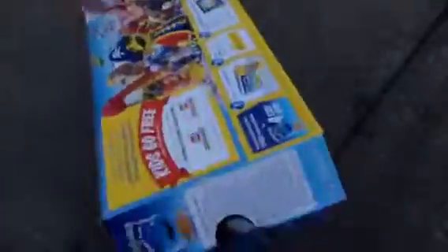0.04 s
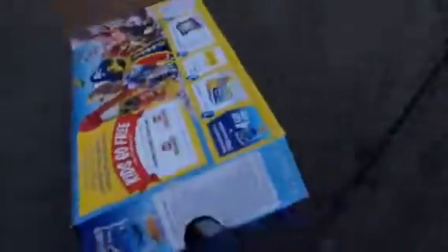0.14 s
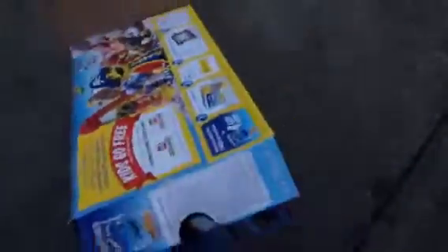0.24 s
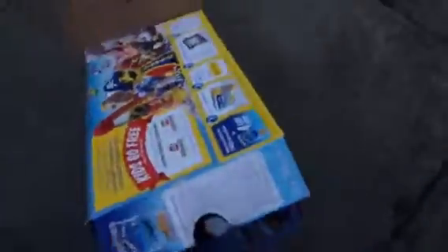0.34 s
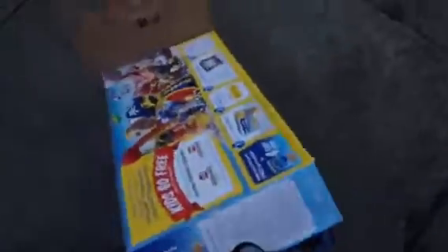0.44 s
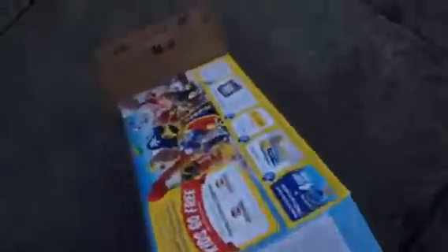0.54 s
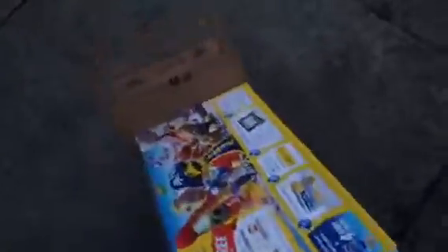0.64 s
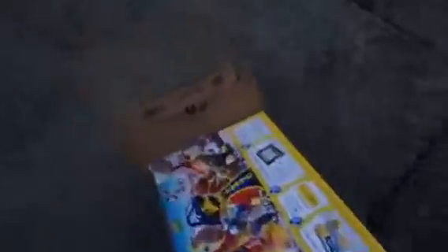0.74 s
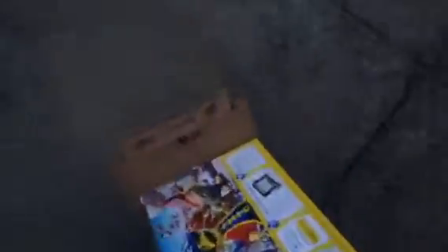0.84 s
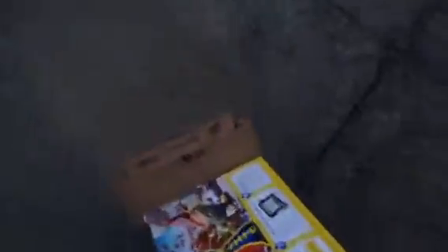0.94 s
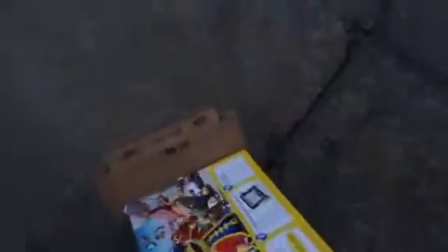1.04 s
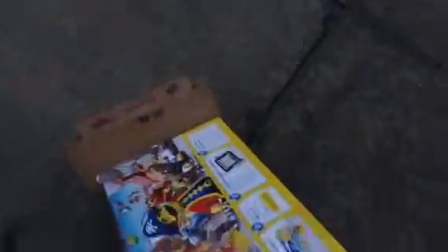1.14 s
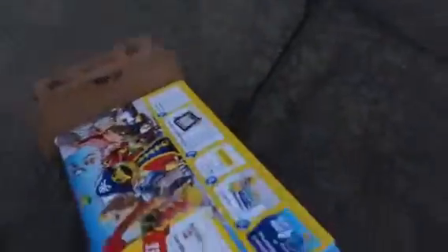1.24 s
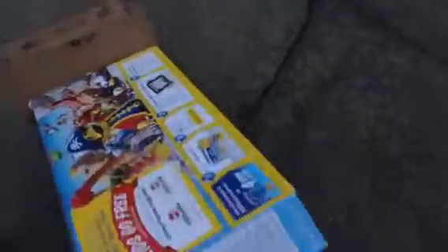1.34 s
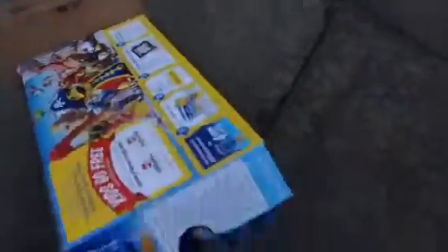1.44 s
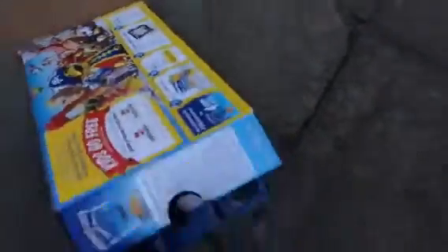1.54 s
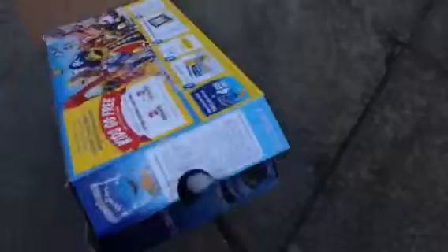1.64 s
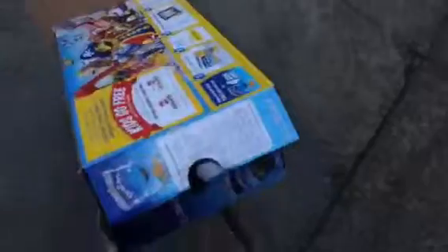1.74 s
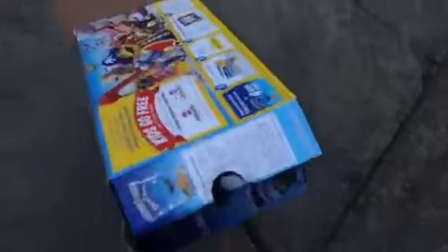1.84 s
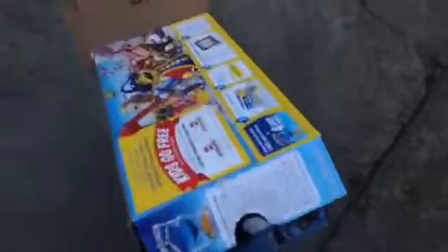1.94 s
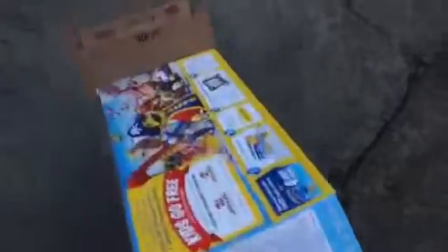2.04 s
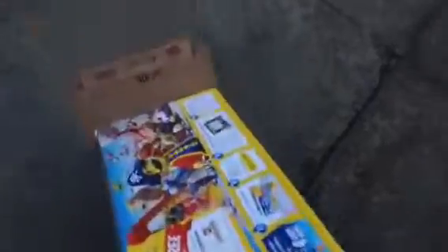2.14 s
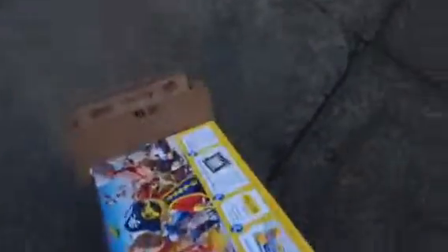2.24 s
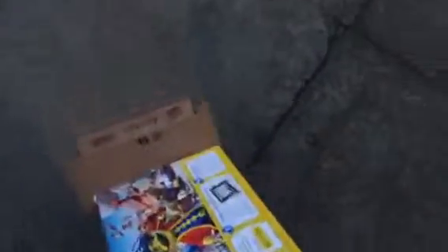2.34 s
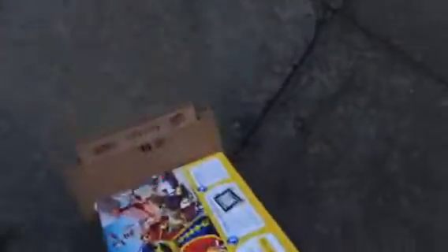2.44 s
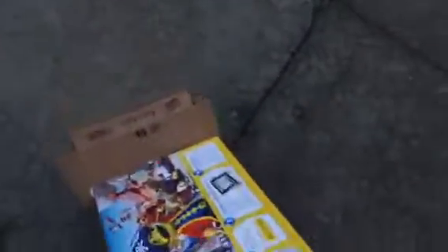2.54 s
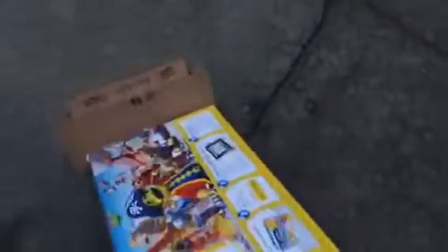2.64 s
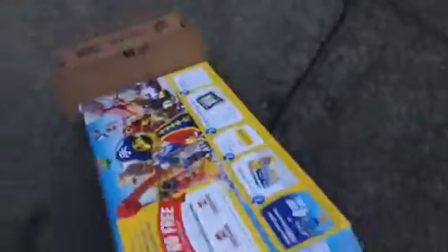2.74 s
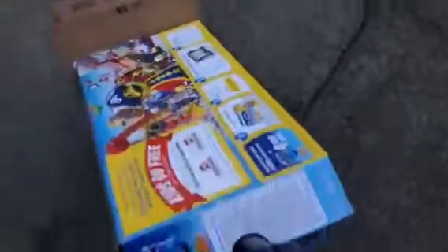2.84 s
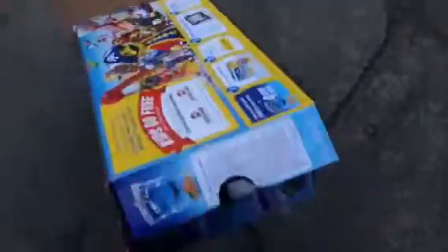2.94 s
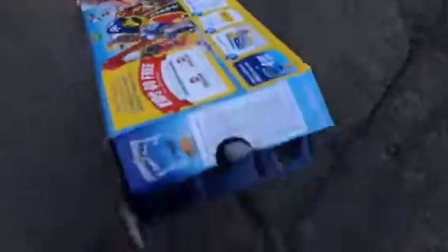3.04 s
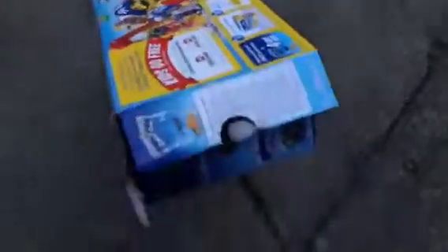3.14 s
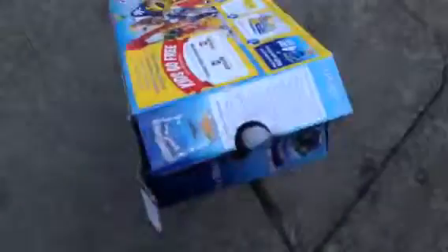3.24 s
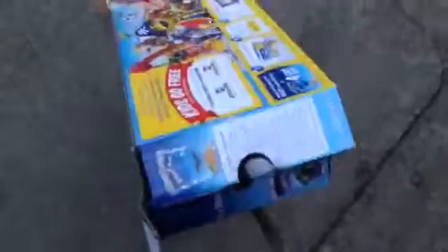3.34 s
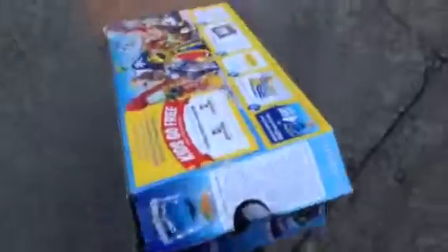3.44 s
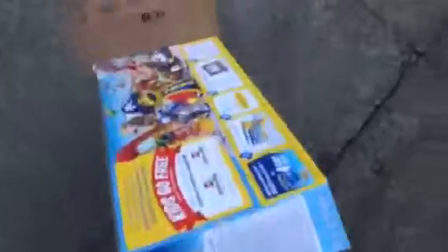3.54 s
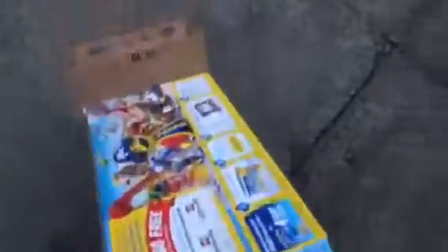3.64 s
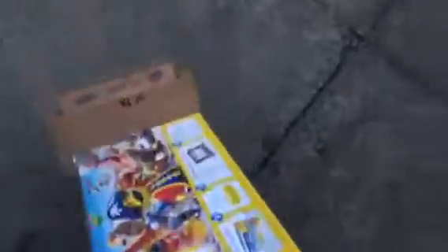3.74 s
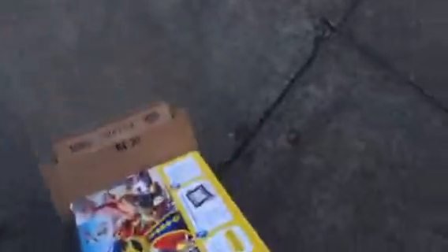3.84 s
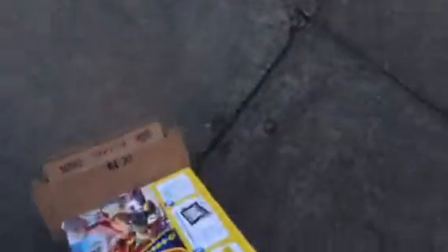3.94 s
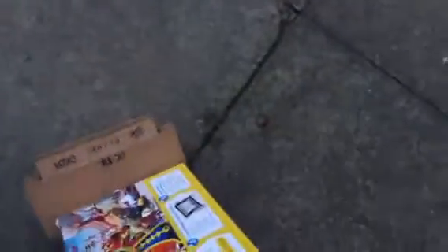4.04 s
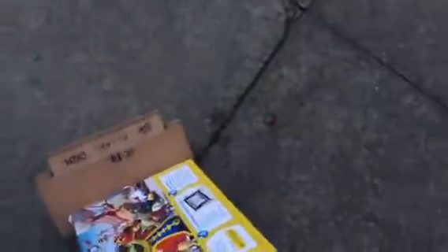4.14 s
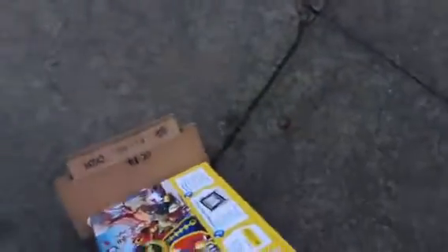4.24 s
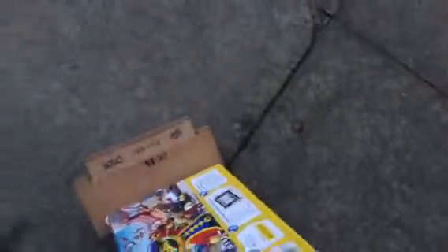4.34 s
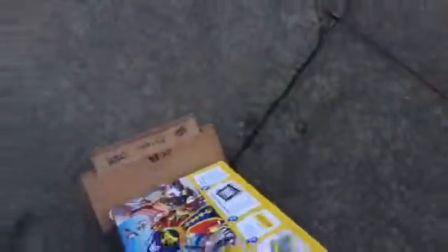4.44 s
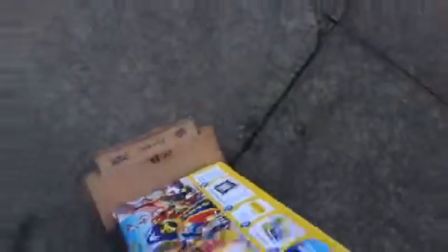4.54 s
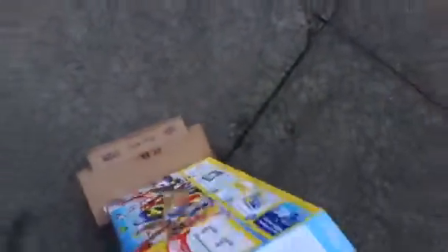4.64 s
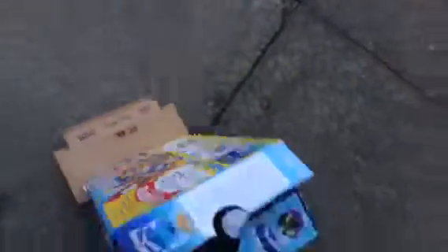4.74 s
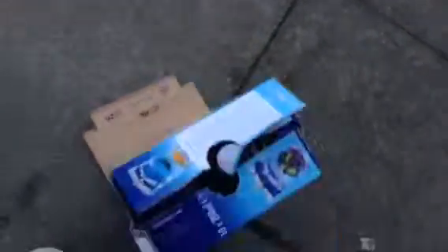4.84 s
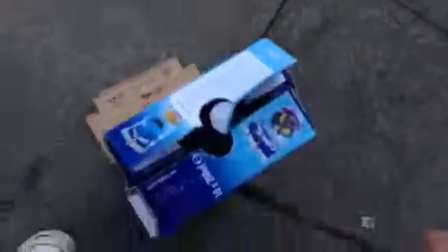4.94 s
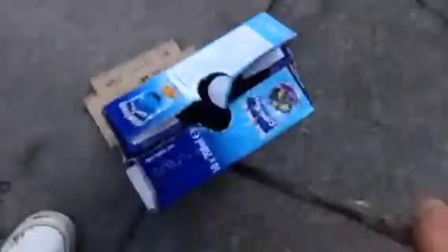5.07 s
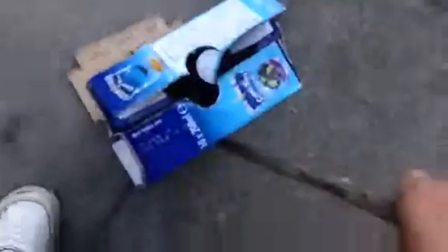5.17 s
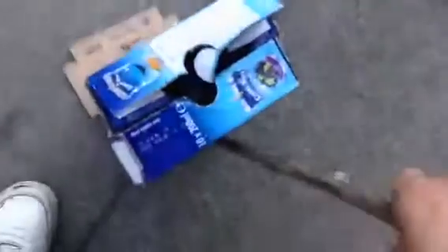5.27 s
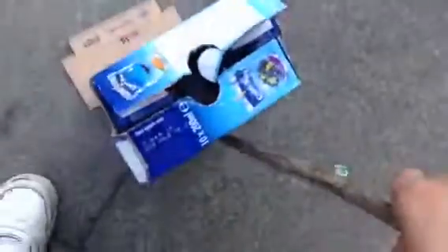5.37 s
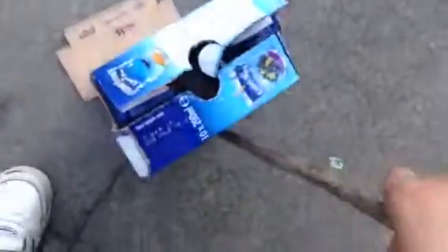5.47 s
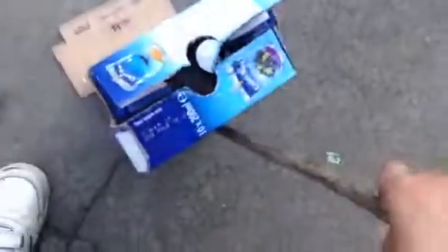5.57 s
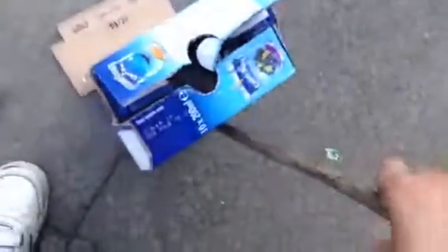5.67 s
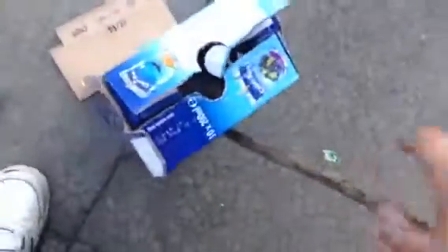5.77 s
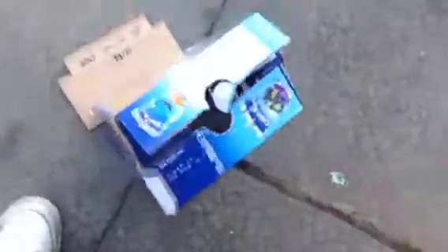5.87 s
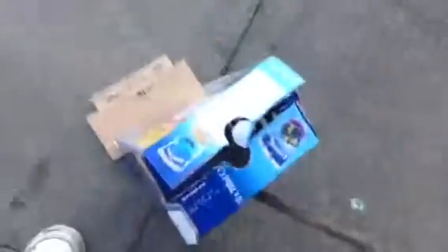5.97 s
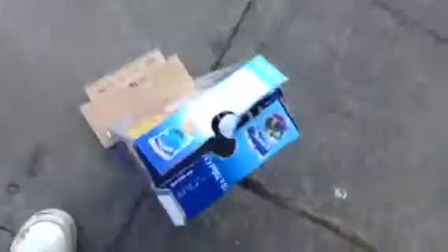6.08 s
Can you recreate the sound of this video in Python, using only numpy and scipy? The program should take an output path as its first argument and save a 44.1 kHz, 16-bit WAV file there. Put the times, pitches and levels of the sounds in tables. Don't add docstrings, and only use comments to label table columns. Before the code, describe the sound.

Outdoors, close and dry, an empty cardboard box is dragged over gritty concrete. The sound begins mid-stroke; pulls and pushes alternate with very short dips near 0.45, 1.15, 1.9, 2.6 and 3.3 seconds. Each scrape mixes bright sandy hiss, papery mid-range rattle and hollow low boom, broken by uneven bumps and snapping grit. The second stroke is louder, the fifth loud and hissing. Thin squeaks sing at turns, notably around 1.1 and an arching one at 3.3 to 3.5. A strong jolt lands at 1.55; near 3.8 the box hops with rapid hollow thumps. Dragging stops about 4.1, with a dull knock and tiny ticks at 4.15. Quiet traffic hum and faint rustle remain. Small ticks at 4.87 lead to a sharp, very short click at 4.94 with a soft low knock. Distant birds chirp and whistle faintly, clearest around 5.2 to 5.8, until just past 6.

```python
import sys
import numpy as np
from scipy import signal
from scipy.fft import rfft, irfft, next_fast_len
from scipy.io import wavfile
from scipy.ndimage import uniform_filter1d

SR = 44100
rng = np.random.default_rng(int(sys.argv[2]) if len(sys.argv) > 2 else 0)


def unload_audio(sound):
    columns = np.transpose(np.atleast_2d(sound))
    steps = np.round(np.clip(columns, -1, 1) * 32767)
    wavfile.write(sys.argv[1], SR, steps.astype(np.int16))


def volts(x):
    e = np.asarray(x, float) / 20
    return 10 ** e


N = 269397

# start t/s, end t/s, panel level/dB, grit over panel/dB, cavity over panel/dB
STROKES = [
    (-.3, 0.44, -37.5, 3, -3),
    (0.476, 1.132, -31.5, -1.5, -2.5),
    (1.169, 1.86, -35.5, 3.5, -2.5),
    (1.923, 2.554, -34.5, -1, -4.5),
    (2.589, 3.295, -31.5, 3, -7),
    (3.345, 4.066, -34.5, 1.5, -3),
    (4.115, 4.232, -48, -22, -4),
]
# t/s, pressure level/dB, lean level/dB (leaning frees the cavity and damps the panels)
HAND = [(0, 5, 8), (0.118, 2, 10), (0.359, -1, -1.5), (0.562, -6.5, 3.5), (0.798, 1, 2), (0.922, 0.5, 3),
        (1.078, -2.5, 1), (1.342, 5, 7), (1.599, 1, 7), (1.8, -3.5, -0.5), (2.001, 0, 4), (2.302, 5.5, 0),
        (2.66, -3, 8), (2.952, 3.5, 1.5), (3.219, -6, 1.5), (3.42, -3, -1), (3.72, 2, 1), (3.99, 2, -1)]
# t/s, peak level/dB
JOLTS = [(0.032, -19), (0.132, -17.5), (0.356, -17), (0.561, -23.5), (0.715, -16.5), (0.812, -16.5),
         (0.848, -19), (0.917, -19), (1.232, -21.5), (1.336, -15.5), (1.551, -11.5), (1.668, -18.5),
         (1.714, -26), (1.955, -23.5), (2.007, -20.5), (2.078, -16.5), (2.142, -19), (2.179, -20.5),
         (2.239, -16.5), (2.297, -22.5), (2.77, -18), (3.024, -21.5), (3.076, -17), (3.374, -24.5),
         (3.604, -16.5), (3.68, -18.5), (3.772, -11), (3.823, -19.5), (3.861, -15.5), (3.922, -12)]
# t/s, peak level/dB
HOP_LANDINGS = [
    (3.791, -19),
    (3.843, -14),
    (3.881, -17),
    (3.904, -20.5),
    (3.964, -23),
]
# t/s, peak level/dB
SNAPS = [(0.0327, -35), (0.0673, -25.5), (0.1438, -14.5), (0.2279, -23), (0.3431, -25), (0.5212, -33.5),
         (0.618, -31), (0.7133, -16.5), (0.9003, -21.5), (1.2441, -20.5), (1.2664, -30), (1.3077, -19),
         (1.33, -26), (1.5549, -25), (1.5871, -21), (1.6376, -21.5), (2.0071, -27.5), (2.1099, -26),
         (2.7752, -24), (2.9399, -22.5), (3.0199, -17), (3.1055, -24.5), (3.2685, -25.5), (3.3686, -25.5),
         (3.4311, -33.5), (3.7684, -30.5), (3.8172, -31), (3.861, -32.5), (3.903, -33), (4.0066, -26)]
# f/Hz, bandwidth/Hz, level/dB
CAVITY_MODES = [(195.7, 44, 5), (310.2, 17, 4), (367.6, 46, 1), (141, 23, -12)]
# f/Hz, bandwidth/Hz, level/dB
PANEL_MODES = [(537, 42, 1.5), (662, 52.6, 5), (806, 83, 3.5), (1036, 170, 6), (1305, 130, 8),
               (1694, 280, 2), (2093, 83, -13.5), (2520, 140, -2)]
# f/Hz, level per Hz/dB
GRIT_SPECTRUM = [(1180, -39), (2000, 5.5), (2410, 1), (2650, -8), (3000, -7), (3270, -0.5), (5550, -1.5),
                 (6610, -4), (12300, -2), (13800, -3.5), (15100, -9), (15700, -22.5), (16400, -58.5)]
# f/Hz, level per Hz/dB
AIR_SPECTRUM = [(15, -95.5), (25, -56), (87, -10), (172, 3), (196, 11), (398, -3.5), (443, -7), (481, -9),
                (805, -5), (1060, -3), (1870, -20.5), (2200, -16.5), (2880, -24.5), (12800, -27.5),
                (16400, -43.5)]
# start t/s, end t/s, f/Hz at start, middle and end, level/dB
SQUEAKS = [
    (1.015, 1.18, 2075, 2070, 2060, -43),
    (3.3, 3.47, 2620, 2810, 2480, -35),
    (3.41, 3.52, 5300, 4850, 4480, -45.5),
    (.41, .51, 2180, 2200, 2180, -54),
    (1.262, 1.33, 2170, 2180, 2190, -37),
    (2.48, 2.63, 2350, 2200, 2110, -39.5),
    (1.878, 1.9, 4150, 4200, 4150, -56),
    (1.9, 1.955, 7600, 7000, 6700, -58),
]
STEADY_SQUEAK = [
    (1.104, 1.245, 2810, 2805, 2803, -37.5),
]
# t/s, peak level/dB, f/Hz, treble level/dB, decay time t60/s
TICKS = [(4.12, -44, 1550, -54, 0.087), (4.127, -45, 4800, -63, 0.054), (4.1495, -35, 1674, -67, 0.012),
         (4.167, -44, 1300, -70, 0.054), (4.18, -55, 4430, -70, 0.04), (4.2037, -49, 5000, -63, 0.0061),
         (4.2165, -51, 2480, -55, 0.009), (4.868, -32, 1800, -75, 0.02), (4.9052, -36, 2450, -43, .008),
         (4.907, -29, 2450, -52, 0.016), (4.92, -44, 2450, -45, 0.036), (4.9361, -11, 2740, -13.5, 0.003),
         (4.9392, -34, 3000, -24.5, 0.0073), (4.9427, -50, 2540, -37, 0.025), (5.22, -63, 3500, -68, 0.012)]
# t/s, peak level/dB, f/Hz, decay time t60/s
KNOCKS = [
    (2.608, -27.5, 427.4, 0.052),
    (4.147, -26.5, 401, 0.067),
    (4.929, -43, 313, 0.14),
]
# start t/s, end t/s, f/Hz at start, middle and end, level/dB
WHISTLES = [
    (4.97, 5.13, 2080, 1900, 1560, -75),
    (5.195, 5.46, 1950, 2570, 2480, -67),
    (5.46, 5.53, 2450, 2360, 2280, -72),
    (5.51, 5.621, 2270, 2190, 1990, -61),
    (6.05, 6.127, 2150, 2260, 2330, -67),
]
# start t/s, end t/s, f/Hz, bandwidth/Hz, level/dB
CHIRPS = [(4.27, 4.55, 2900, 110, -72), (4.33, 4.44, 3315, 170, -71), (4.33, 4.37, 2420, 130, -74),
          (4.35, 4.45, 3975, 120, -77), (4.55, 4.7, 2890, 120, -83), (4.74, 4.77, 1750, 400, -72),
          (4.775, 4.8, 2400, 200, -73), (4.775, 4.8, 3300, 200, -76), (5.38, 5.7, 1885, 60, -75),
          (5.515, 5.56, 4175, 300, -70), (5.64, 5.74, 2175, 250, -73), (5.63, 5.74, 3180, 200, -80),
          (5.78, 5.93, 2330, 350, -72), (5.865, 5.93, 3225, 250, -70), (5.87, 5.925, 4125, 200, -70),
          (5.88, 5.915, 4900, 200, -73), (5.8, 6.11, 1790, 250, -72), (5.93, 6.05, 3175, 250, -80)]
RUSTLES = [
    (4.26, 4.52, 2300, 2500, -72),
    (5.51, 5.56, 7000, 9000, -73),
    (5.87, 5.93, 7500, 9000, -72),
]
FALLING_CHIRPS = [
    (4.22, 4.35, 2300, 400, -75),
    (5.51, 5.56, 3100, 300, -72),
    (5.72, 5.79, 3200, 400, -65),
    (5.74, 5.8, 2400, 300, -65),
]


def evened(x):
    return x / np.sqrt(np.mean(x ** 2) + 1e-20)


def add(mix, s, sound):
    part = mix[round(s * SR):][:len(sound)]
    part += sound[:len(part)]


def coloured(x, spectrum):
    hz, db = np.transpose(spectrum)
    size = next_fast_len(len(x))
    frequency = np.fft.rfftfreq(size, 1 / SR)
    gain = volts(np.interp(np.log(frequency + 1), np.log(hz), db))
    return evened(irfft(rfft(x, size) * gain, size)[:len(x)])


def resonate(x, hz, width):
    turn = np.exp(2j * np.pi * np.cumsum(hz * np.ones(len(x))) / SR)
    r = np.exp(-np.pi * width / SR)
    return 2 * (turn * signal.lfilter([1 - r], [1, -r], x / turn)).real


def ring(x, modes, factor=1):
    total = 0
    for k, (hz, width, db) in enumerate(modes):
        total = total + (-1) ** k * volts(db) * resonate(x, hz * factor, width)
    return total


def jolt(rise_s, fall_s):
    t = np.arange(1500) / SR
    shape = (1 - np.exp(-t / rise_s)) * np.exp(-t / fall_s)
    return shape / shape.max()


def strokes():
    speed_up_s, slow_down_s = 0.088, 0.09
    rest_db, grit_rest_db = -57.5, 0.5
    cavity_lag_s, cavity_holds = .01, 0.46
    pull, push = 0.997, 0.942
    t = np.arange(N) / SR

    start, end, stroke_db, grit_db, boom_db = np.transpose(STROKES)
    k = np.clip(np.searchsorted(start, t) - 1, 0, None)
    speed = np.clip(np.minimum((t - start[k]) / speed_up_s, (end[k] - t) / slow_down_s), 0, 1)
    base_db = stroke_db[k] + 21 * np.log10(speed + 0.059)

    s, press_db, lean_db = np.transpose(HAND)
    press_db, lean_db = np.interp(t, s, press_db), np.interp(t, s, lean_db)
    hop = uniform_filter1d(1. * (t > 3.785) * (t < 3.935), size=900)
    hop_lift_db, hop_boom_db = -7 * hop, 11 * hop

    held_db = cavity_holds * (stroke_db[k] - base_db) * (t < start[-1])
    cavity_db = np.interp(t - cavity_lag_s, t, base_db + held_db + boom_db[k])
    cavity_db = cavity_db + press_db + lean_db + hop_boom_db
    panel_db = base_db + press_db - 0.13 * lean_db + hop_lift_db
    grit_db = base_db + 0.86 * press_db + grit_db[k] + hop_lift_db
    floor_db = rest_db + np.array([[0], [0], [grit_rest_db]])
    return np.maximum([cavity_db, panel_db, grit_db], floor_db), np.where(k % 2, push, pull)


def slips(panel_db, grit_db):
    chatter_per_s, chatter_jitter = 60, .2
    jolts, snaps = np.array(JOLTS + HOP_LANDINGS), np.array(SNAPS)
    turns = np.array(STROKES)[1:, 0]
    hard = np.sort(np.r_[jolts[:, 0], snaps[:, 0], turns, STROKES[-1][1]])
    steps = np.r_[0, np.cumsum(np.round(np.diff(hard) * chatter_per_s))]
    shift, panel_draw, grit_draw = rng.standard_normal((400, 3))[:int(steps[-1])].T
    step = np.arange(len(shift))
    free = ~np.isin(step, steps)
    at = (np.interp(step + chatter_jitter * shift, steps, hard) * SR).astype(int)[free]

    out = np.zeros((2, N))
    out[0, at] = volts(panel_db[at] + 6 + 1.5 * np.minimum(panel_draw[free], 1))
    out[1, at] = volts(grit_db[at] - 5 + 11 * np.minimum(grit_draw[free], .7))
    jolt_at, snap_at = (jolts[:, 0] * SR).astype(int), (snaps[:, 0] * SR).astype(int)
    out[:, jolt_at] = volts(jolts[:, 1] - 4.5 + [[0], [-9]])
    out[:, snap_at] += volts(snaps[:, 1] + [[-8.5], [0]])
    return out


def patchy(x, patch_db):
    z = signal.stft(x, nperseg=256)[2]
    patches = uniform_filter1d(rng.standard_normal(z.shape), size=12, axis=0)
    patches = evened(uniform_filter1d(patches, size=3, axis=1))
    return evened(signal.istft(z * volts(patch_db * patches), nperseg=256)[1][:len(x)])


def drag():
    (cavity_db, panel_db, grit_db), pitch = strokes()
    still_s = STROKES[-1][1] + .05
    moving = np.clip((still_s - np.arange(N) / SR) / .1, 0, 1)

    catches = volts(6.5 * np.minimum(rng.exponential(1, N), 4)) * (rng.random(N) < 260 / SR)
    catches = evened(signal.oaconvolve(catches, jolt(0.000592, 0.0028))[:N])
    catches = evened(1.6 + catches)
    panel_train, grit_train = slips(panel_db, grit_db)
    panel_slips = signal.oaconvolve(panel_train, jolt(.0008, .002))[:N]
    grit_slips = signal.oaconvolve(grit_train, jolt(.0004, .002) + .15 * jolt(.001, .01))[:N]

    rub = rng.standard_normal(N)
    bend = uniform_filter1d(uniform_filter1d(rng.standard_normal(N), size=3000), size=3000)
    pitch = pitch * (1 + .04 * evened(bend))
    panel_scale = np.std(ring(rub, PANEL_MODES))
    panel_force = np.hypot(volts(panel_db - 2) * catches * moving, panel_slips)
    kick = 4.6
    panels = ring(rub * panel_force + kick * panel_train, PANEL_MODES, pitch) / panel_scale

    grit_force = np.hypot(volts(grit_db - 5.0) * catches * moving, grit_slips)
    grit = patchy(coloured(rub, GRIT_SPECTRUM), patch_db=2.5) * grit_force

    jolts = panel_force / np.sqrt(abs(uniform_filter1d(panel_force ** 2, 4000)) + 1e-12)
    cavity = ring(rng.standard_normal(N) * (0.58 + jolts), CAVITY_MODES)
    cavity = signal.sosfilt(signal.butter(4, [125, 700], "band", fs=SR, output="sos"), cavity)
    cavity = cavity / np.std(cavity[:round(still_s * SR)]) * volts(cavity_db - 3.47) * moving

    rumble = volts(-20) * resonate(resonate(rub * panel_slips, 25, 29), 25, 29)
    return panels + grit + cavity + rumble


def echoes(x, t60):
    tail = rng.standard_normal(SR // 2) * volts(-60 * np.arange(SR // 2) / SR / t60)
    tail[:200] = 0
    return signal.fftconvolve(x, tail / np.linalg.norm(tail))[:N]


def street():
    swell = evened(uniform_filter1d(uniform_filter1d(rng.standard_normal(N), 5000), 5000))
    rustle_db = 4 * np.exp(-abs(np.arange(N) / SR - 4.3) / .2)
    level_db = -62.5 + .7 * swell + rustle_db
    return volts(level_db) * coloured(rng.standard_normal(N), AIR_SPECTRUM)


def tones(notes, waver_db, fade_db):
    out = np.zeros(N)
    for start, end, *hz, db in notes:
        u = np.linspace(0, 1, round((end - start) * SR))
        pitch = np.polyval(np.polyfit([0, .5, 1], hz, 2), u)
        waver, drift = (evened(uniform_filter1d(rng.standard_normal(14000), size=400))[:len(u)] for _ in "ab")
        tone = np.sin(2 * np.pi * np.cumsum(pitch) / SR + .15 * waver_db * drift)
        level = volts(db + 3 + waver_db * waver - fade_db * u)
        add(out, start, level * tone * signal.windows.tukey(len(u), .35))
    return out


def squeaks():
    return tones(SQUEAKS, waver_db=3.5, fade_db=9) + tones(STEADY_SQUEAK, waver_db=.5, fade_db=0)


def settling():
    out, t = np.zeros(N), np.arange(9000) / SR
    for s, db, hz, treble_db, t60 in TICKS:
        body_noise, edge_noise = rng.standard_normal((2, len(t)))
        narrow = evened(resonate(body_noise, hz, 370))
        wide = evened(resonate(resonate(body_noise, hz, 1920), hz, 1630))
        body = volts(db - 7.5) * evened(narrow + wide)
        edge = volts(treble_db) * coloured(edge_noise, [(2500, -34), (5000, -23), (14000, -29.0), (16500, -33)])
        decay = volts(-60 * t / t60) + .012 * volts(-60 * t / .12) + .003 * volts(-60 * t / .4)
        add(out, s, (body + edge) * decay * np.minimum(t / .0003, 1))
    for s, db, hz, t60 in KNOCKS:
        onset = np.sin(np.pi / 2 * np.minimum(t / 0.0051, 1)) ** 2
        add(out, s, volts(db - 60 * t / t60) * np.sin(2 * np.pi * hz * t) * onset)
    return signal.sosfilt(signal.butter(4, 150, "high", fs=SR, output="sos"), out)


def birds():
    out = tones(WHISTLES, waver_db=4.5, fade_db=0.0)
    level_calls = [(*row, 1) for row in CHIRPS + RUSTLES]
    falling_calls = [(*row, .87) for row in FALLING_CHIRPS]
    for start, end, hz, width, db, fall in level_calls + falling_calls:
        pitch = np.linspace(hz, hz * fall, round((end - start) * SR))
        noise = rng.standard_normal(16000)[:len(pitch)]
        blur = resonate(resonate(noise, pitch, width), pitch, width)
        add(out, start, volts(db) * evened(blur) * signal.windows.tukey(len(pitch), .6))
    return out + volts(-5) * echoes(out, t60=.4)


def scene():
    box = drag() + squeaks() + settling()
    room = volts(-20) * echoes(box, t60=.12)
    return (box + room + street() + birds())[None]


def low_pass(x):
    return signal.sosfilt(signal.butter(12, 16510, fs=SR, output="sos"), x)


def record(dry):
    edge = signal.firwin(401, 15600, window=("kaiser", 6), fs=SR)
    mix = signal.oaconvolve(dry, edge[None], "same")
    return low_pass(mix)


dry = scene()
out = record(dry)
unload_audio(out)
```